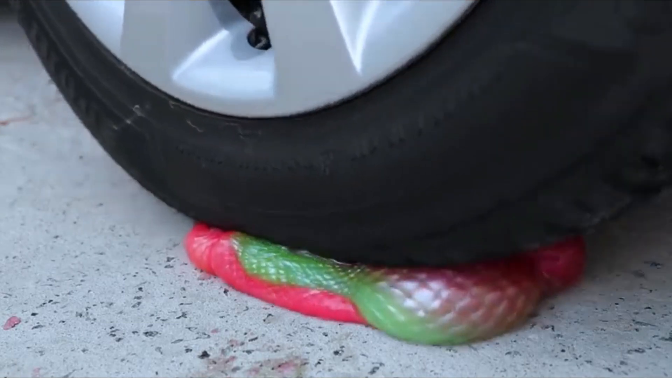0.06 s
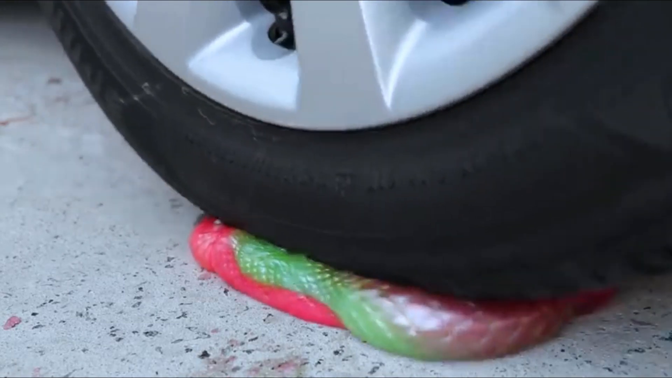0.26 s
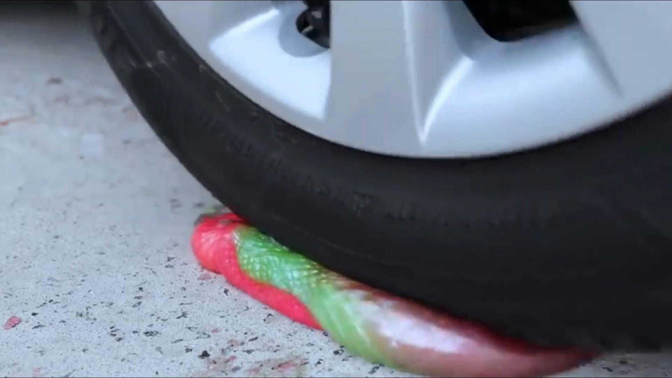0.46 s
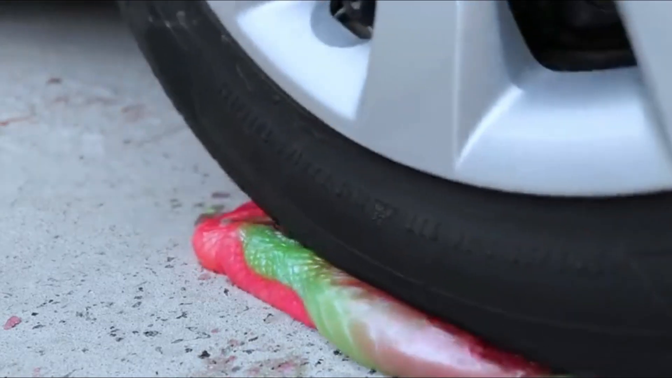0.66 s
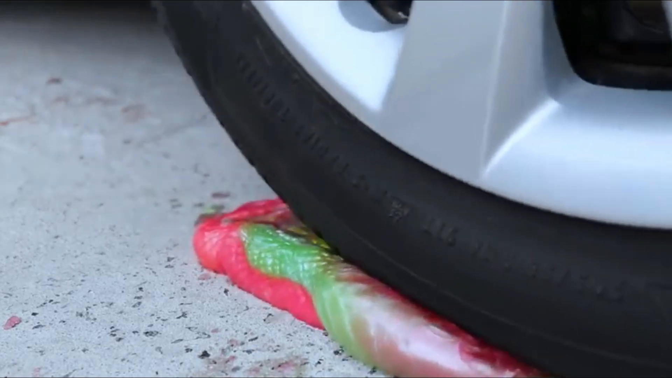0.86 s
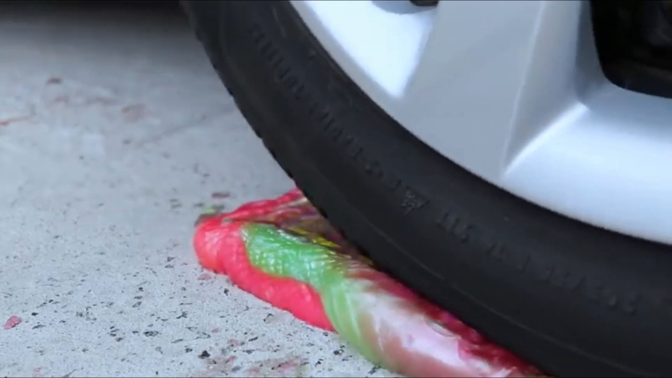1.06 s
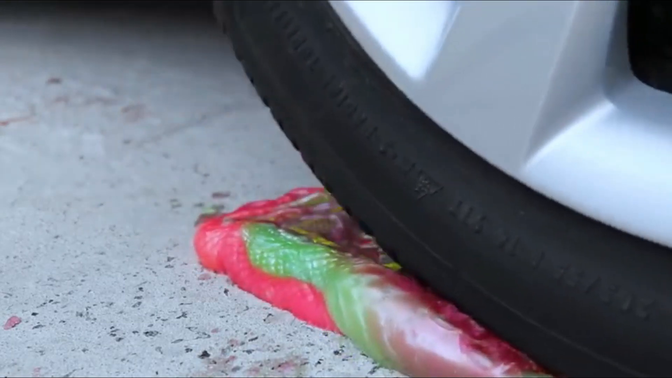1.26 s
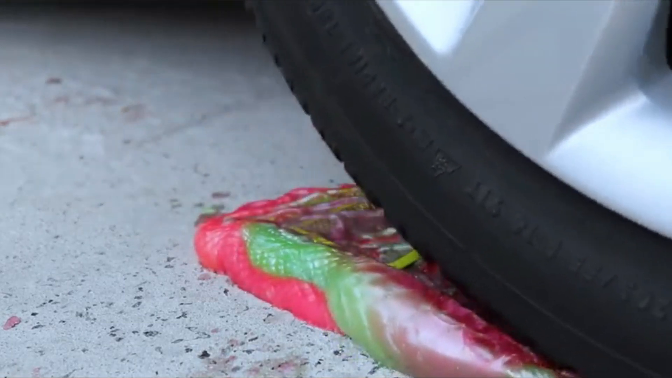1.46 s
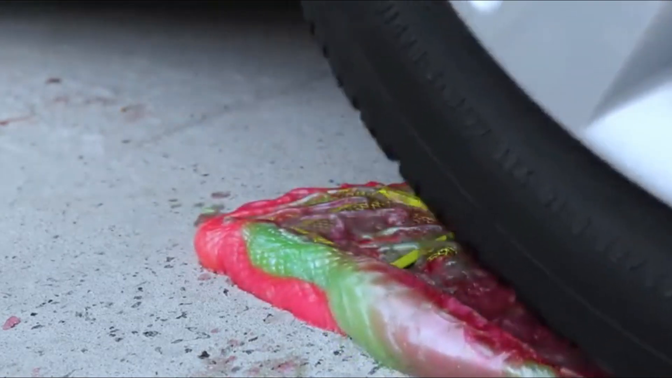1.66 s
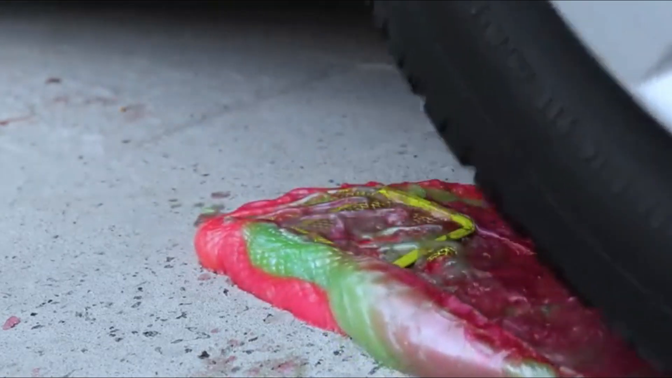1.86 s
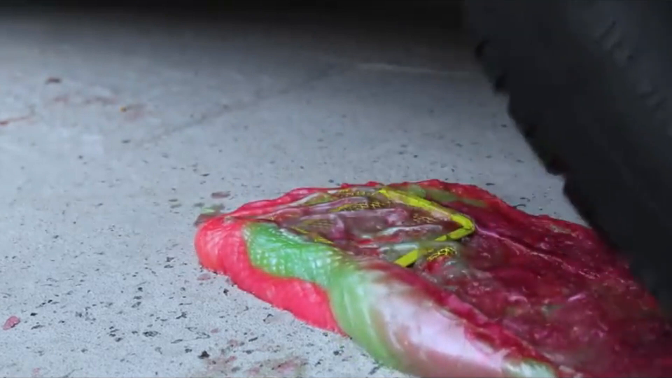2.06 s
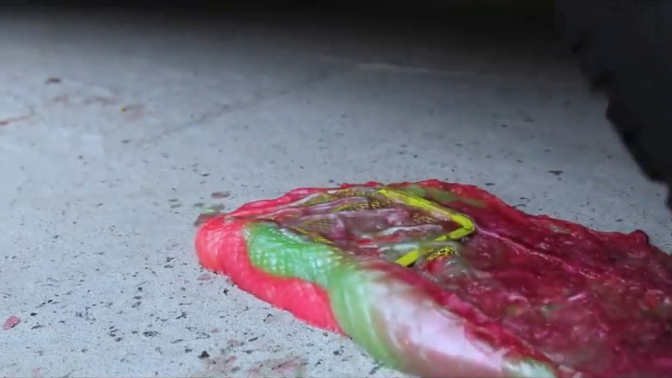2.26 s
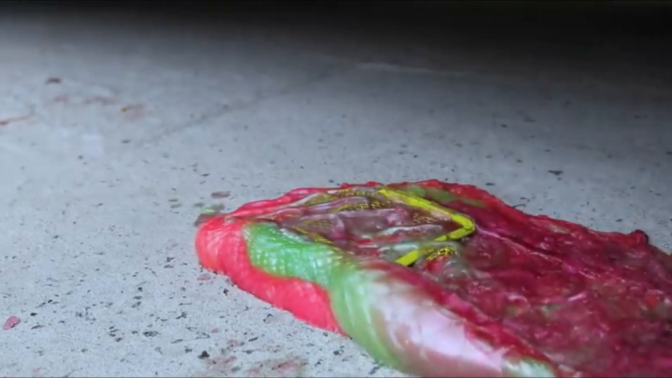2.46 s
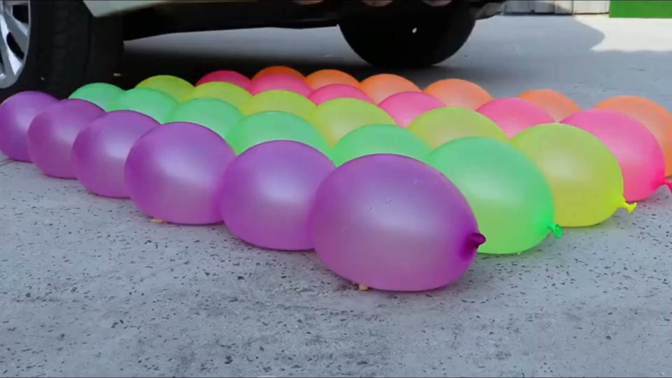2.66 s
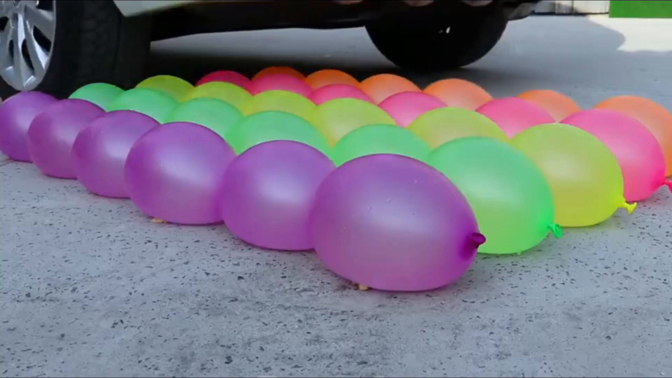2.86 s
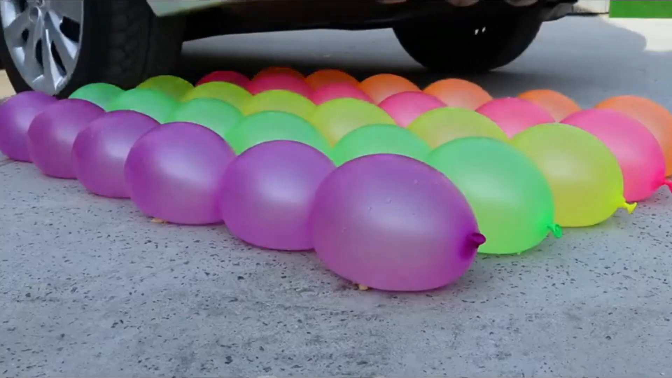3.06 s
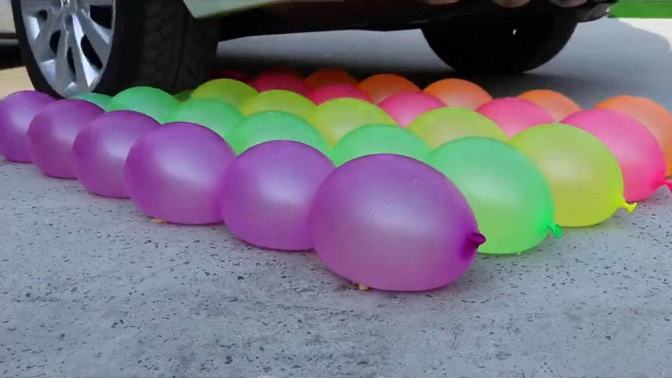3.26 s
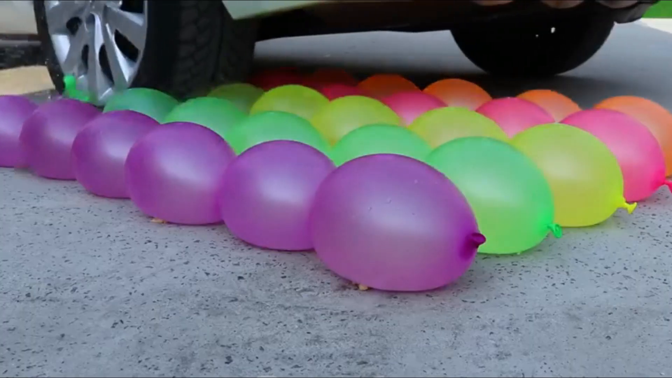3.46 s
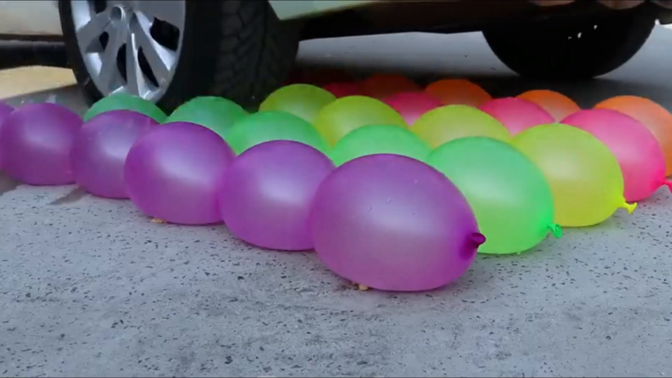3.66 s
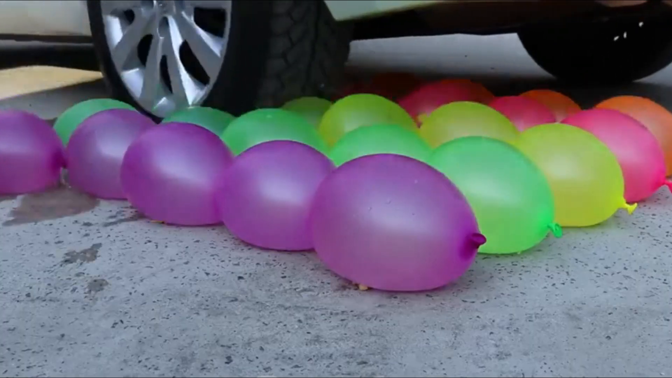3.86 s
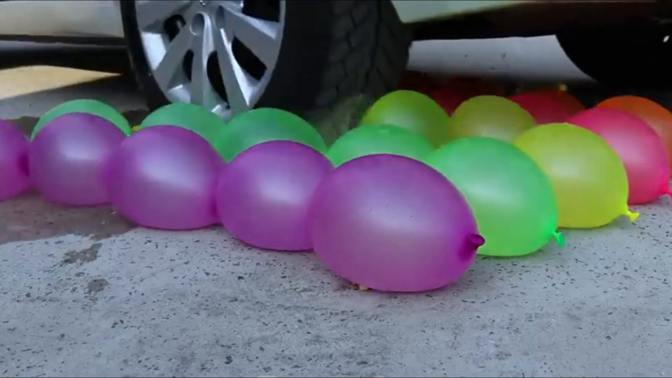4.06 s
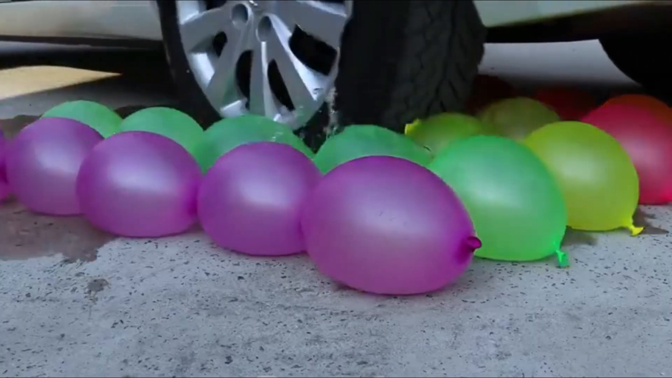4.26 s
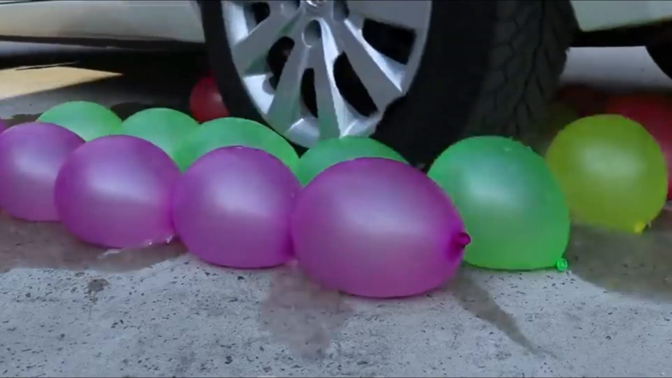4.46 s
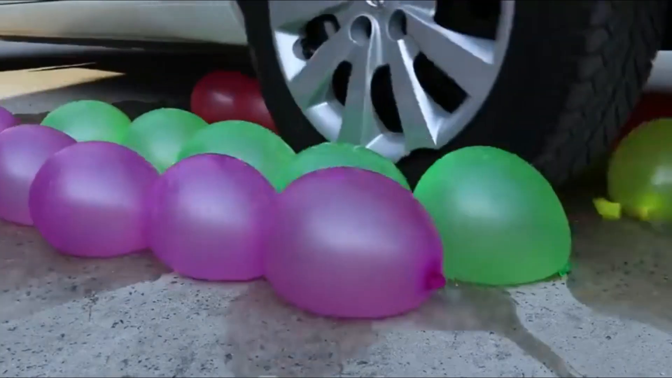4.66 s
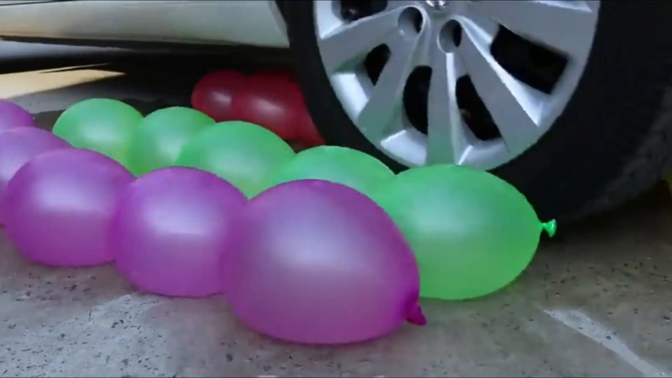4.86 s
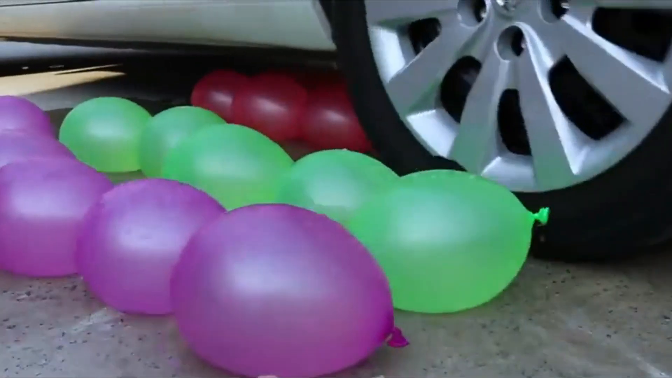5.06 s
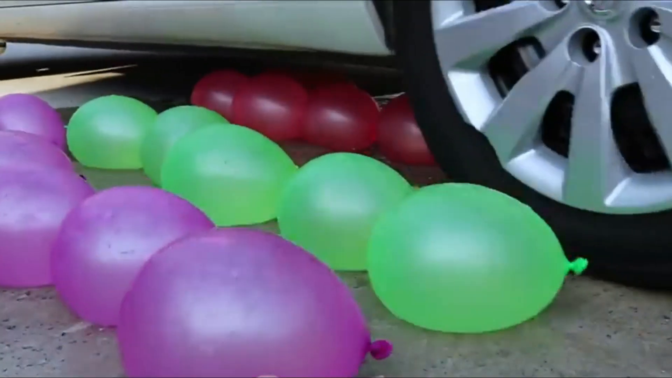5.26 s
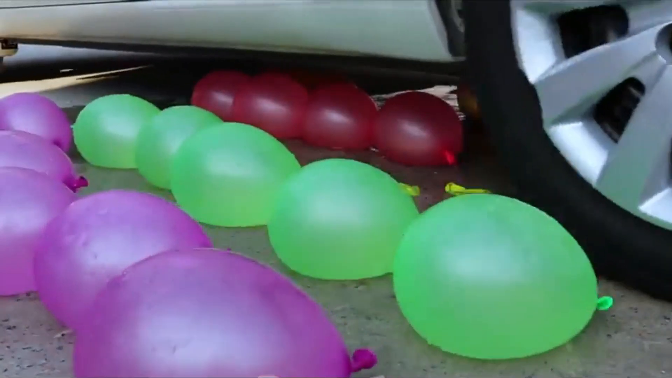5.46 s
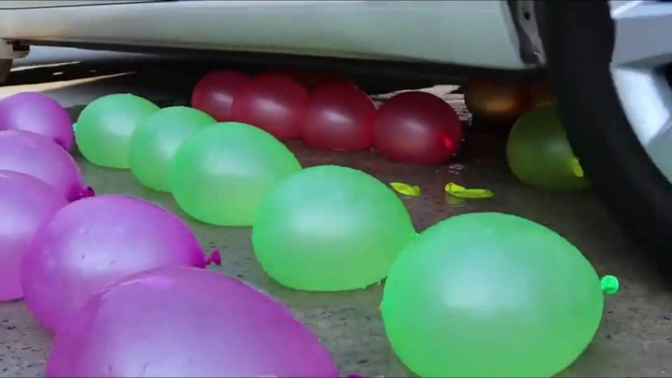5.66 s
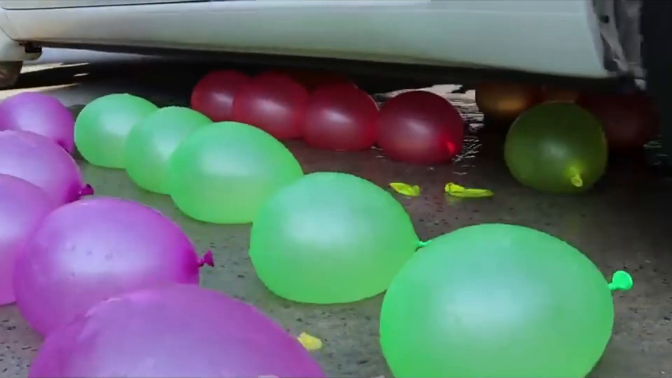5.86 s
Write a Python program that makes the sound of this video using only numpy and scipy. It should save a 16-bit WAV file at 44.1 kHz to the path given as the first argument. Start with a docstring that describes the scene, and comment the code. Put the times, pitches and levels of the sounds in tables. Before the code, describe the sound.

Close up on a quiet outdoor pavement, a car tyre flattens a slime-filled ball: soft squelches, irregular wet ticks, fine crackle and tiny rubbery squeaks, with a very high, faint brake squeal. After a short lull, four water balloons crack open about a second apart in total, far louder than before, with spray, slaps and gurgling, thinning to drips over faint traffic. Dry, close mono microphone.

```python
"""A quiet street: a car tyre squashes a slime-filled mesh ball on concrete, then rolls into water balloons.
The slime gives wet ticks, crackle and squeaks, made from short noises, ringing clicks and gliding tones.
A thin brake squeal is one high tone. Four balloons burst as cracks of noise with a ringing cavity and spray.
Water gushes, slaps and gurgles as ringing clicks and rising tones, the air in the tyre hums as a low tone,
and drops patter out over the street's traffic hiss and rumble."""
import sys
import numpy as np
from scipy import signal
from scipy.fft import rfft, irfft
from scipy.io import wavfile
from scipy.ndimage import uniform_filter1d

SR = 44100
rng = np.random.default_rng(int(sys.argv[2]) if len(sys.argv) > 2 else 0)


def to_wav(sig):
    """Store sig (one row per channel, or 1-D mono) as 16-bit WAV at the path in sys.argv[1].

    Samples outside -1..1 are clipped; the rate is SR.
    """
    pcm = np.clip(np.atleast_2d(sig), -1, 1) * 32767
    pcm = np.round(pcm).astype(np.int16)
    wavfile.write(sys.argv[1], SR, pcm.T)  # frames by channels


N = 261072   # length of the sound in samples

# Gushes of loose water, each running until the next: start_s [s], gurgle_db [dB], gurgle_centre_hz [Hz],
# gurgle_drain [dB per s], spatter_db [dB], spatter_drain [dB per s]
GUSH_TABLE = [(3.51, -45, 888, 16, -35, 67), (3.94, -46, 1050, 60, -46.5, 58),
              (4.0, -34, 1180, 49, -49.5, 15), (4.236, -39, 820, 10, -39.5, 34),
              (4.603, -33.5, 885, 257, -42, 197), (4.705, -46, 940, 78, -52.5, 66)]


def amp(db):
    """Turn decibels into a gain."""
    return 10 ** (np.asarray(db) / 20)


def rms_one(x):
    """Scale a signal to an average strength (rms) of 1."""
    return x / np.sqrt(np.mean(x ** 2) + 1e-20)


def in_time(rows):
    """Draw each column of a curve table at every sample; outside its span it is silent (-120 dB)."""
    start_s, *columns = np.transpose(rows)
    t = np.arange(N) / SR
    return [np.interp(t, start_s, column, left=-120, right=-120) for column in columns]


def drift(rate_hz):
    """Smooth random wandering with rms 1; a higher rate wanders faster."""
    step = 40   # samples between the wandering points
    r = np.exp(-2 * np.pi * step * rate_hz / SR)
    noise = rng.standard_normal(N // step + 2002)
    slow = signal.lfilter([1], [1, -2 * r, r * r], noise)[2000:]   # drop the filter's start-up
    return np.interp(np.arange(N) / step, np.arange(len(slow)), rms_one(slow))


def resonate(x, hz, width_hz):
    """Let a signal ring at one pitch: a two-pole resonance with gain 1 at its top."""
    r = np.exp(-np.pi * width_hz / SR)
    top = (1 - r * r) / 2
    return signal.lfilter([top, 0, -top], [1, -2 * r * np.cos(2 * np.pi * hz / SR), r * r], x)


def coloured(size, spectrum, tilt_db=0.):
    """Noise of rms 1 shaped by a spectrum table, tilted by so many dB per octave about 2 kHz."""
    hz = np.maximum(np.fft.rfftfreq(size, 1 / SR), 1)
    table_hz, table_db = np.array(spectrum).T
    db = np.interp(np.log(hz), np.log(table_hz), table_db) + tilt_db * np.log2(hz / 2000)
    return rms_one(irfft(rfft(rng.standard_normal(size)) * amp(db), size))


def add(out, start_s, sound):
    """Mix a sound in at its start time."""
    i = round(start_s * SR)
    out[i:i + len(sound)] += sound[:N - i]


def span(low_hz, high_hz, tilt_db, count):
    """Pitches spread evenly in octaves and their strengths, tilted in dB from lowest to highest."""
    return np.geomspace(low_hz, high_hz, count), amp(np.linspace(0, tilt_db, count))


def grains(per_s, pitches_hz, weights, cycles, spread_db):
    """Random clicks of uneven size, each ringing a few cycles at one of the pitches; rms about 1."""
    sizes = amp(spread_db * np.minimum(rng.exponential(1, N), 4)) * rng.choice([-1, 1], N)
    clicks = sizes * (rng.random(N) < per_s / SR) + 1e-18
    dealt = rng.integers(0, len(pitches_hz), N)   # which pitch each click gets
    total = 0
    for k, (hz, weight) in enumerate(zip(pitches_hz, weights)):
        ring = resonate(clicks * (dealt == k), hz, 2.95 * hz / cycles)
        total = total + weight * rms_one(resonate(ring, hz, hz))
    return total / np.sqrt(sum(weight ** 2 for weight in weights))


def wet_hits(rows, width_share):
    """Each contact is a snap with a bright edge, then a short puff through the same pocket of air."""
    snap_t60_s = 0.0012   # time to fade by 60 dB
    out, t = np.zeros(N), np.arange(4096) / SR
    for start_s, peak_db, hz, puff_t60_s, puff_db, edge_db in rows:
        puff, snap = rng.standard_normal((2, len(t)))
        puff = resonate(puff * amp(-60 * t / puff_t60_s), hz, width_share * hz)
        puff = resonate(puff, hz, 1.55 * hz)
        snap = snap * amp(-60 * t / snap_t60_s)
        edge = resonate(snap, 8800, 9000)
        body = resonate(resonate(snap, hz, 0.89 * hz), hz, 1.7 * hz)
        # puff and edge levels are relative to the snap's peak
        for part, part_db in ((body, 0), (puff, puff_db), (edge, edge_db)):
            add(out, start_s, amp(peak_db + part_db) * part / np.abs(part).max())
    return out


def chance_hits(start_s, end_s, bed_db, above_db, spread_db, low_hz, high_hz, count):
    """Rows (start_s, peak_db, pitch_hz) of small random contacts, as strong as the bed they rise from."""
    when, weakness, pitch = rng.random((count, 3)).T
    hit_s = start_s + (end_s - start_s) * when
    peak_db = bed_db[(hit_s * SR).astype(int)] + above_db - spread_db * weakness
    return np.transpose([hit_s, peak_db, low_hz * (high_hz / low_hz) ** pitch])


def glides(rows, overtone_db, onset):
    """Short gliding tones, uneven in strength and pitch, with up to two overtones; a small onset is abrupt."""
    out = np.zeros(N)
    for start_s, length_s, start_hz, end_hz, level_db, rough in rows:
        u = np.linspace(0, 1, int(length_s * SR))   # progress through the tone
        wobble = rms_one(uniform_filter1d(rng.standard_normal((2, 4096)), size=60))[:, :len(u)]
        hz = start_hz * (end_hz / start_hz) ** u * (1 + .05 * rough * wobble[0])
        phase = 2 * np.pi * np.cumsum(hz) / SR
        tone = sum(amp(overtone_db * k) * np.sin((k + 1) * phase)
                   for k in range(3) if (k + 1) * end_hz < .4 * SR)   # leave out overtones that are too high
        swell = np.sin(np.pi * u ** onset)
        add(out, start_s, amp(level_db) * tone * swell * (1 + rough * wobble[1]))
    return out


def bursts():
    """The skin rips in a dense crack, the squeezed cavity rings noisily, spray and a dull thump follow."""
    # Balloon bursts: start_s [s], level_db [dB] of the whole burst; relative to it tear_db [dB]; cavity_hz [Hz],
    # cavity_db [dB], cavity_t60_s [s], spray_db [dB]; tilt_db [dB per octave] of crack and spray
    burst_table = [(3.4972, -12.5, 9.5, 2660, 6.5, 0.021, -16, -3),
                   (3.9853, -12.5, -11.5, 1340, 10.5, 0.047, -5, -2.5),
                   (4.2196, -13, 6, 1630, -1.5, 0.053, -20, -2.07),
                   (4.5900, -17.5, 2.5, 863, 1.5, 0.031, -8.5, 0.7)]
    # Colour of the crack: pitch_hz [Hz], level_db [dB per Hz]
    crack_spectrum = [(60, -47.5), (150, -12), (700, 5.5), (1800, -9.5), (4200, -3), (6300, -11),
                      (8500, -4.5), (13500, -10.5), (16000, -17.5)]
    # Colour of the spray: pitch_hz [Hz], level_db [dB per Hz]
    spray_spectrum = [(100, -29), (400, -8), (1200, 7.5), (3000, -11), (6000, -10.5), (9000, -15),
                      (16000, -23)]
    crack_t60_s, tear_t60_s, spray_t60_s = 0.049, 0.007, 0.18   # times to fade by 60 dB
    low_pass = signal.butter(2, 1100, fs=SR, output="sos")
    high_pass = signal.butter(2, 250, "high", fs=SR, output="sos")
    out, size = np.zeros(N), 2 ** 14
    t = np.arange(size) / SR
    for start_s, level_db, tear_db, hz, cavity_db, cavity_t60_s, spray_db, tilt_db in burst_table:
        noise = coloured(size, crack_spectrum, tilt_db)
        # the tear is heard first, the mass of water moves later: the low part comes in over a few ms
        noise = noise - signal.sosfiltfilt(low_pass, noise) * np.exp(-(t / .003) ** 2)
        fade = amp(-60 * t / crack_t60_s) + amp(tear_db - 60 * t / tear_t60_s)
        crack = noise * fade * np.minimum(t / 0.000099, 1)

        lumps = amp(1.6 * rms_one(uniform_filter1d(rng.standard_normal(size), size=150)))   # spray lands in lumps
        spray = coloured(size, spray_spectrum, tilt_db) * lumps
        spray = spray * amp(spray_db - 60 * t / spray_t60_s) * np.minimum(t / 0.005, 1)

        cavity = rms_one(resonate(resonate(rng.standard_normal(size), hz, 0.14 * hz), hz, hz))
        cavity = cavity * amp(cavity_db - 60 * t / cavity_t60_s) * np.minimum(t / 0.0045, 1)

        thump = rms_one(resonate(rng.standard_normal(size), 90, 110))
        thump = thump * amp(-33.5 - 60 * t / .5) * np.minimum(t / 0.021, 1)

        sharp = signal.sosfilt(high_pass, crack + cavity)   # a small tear radiates no bass
        add(out, start_s, amp(level_db) * (sharp + spray + thump))
    return out


def water():
    """Gurgling bubbles in the gush, spatter and fine patter, slaps, drops, and the hum of the tyre's air ring."""
    # Water slapping concrete and rubber: start_s [s], peak_db [dB], pitch_hz [Hz]
    slap_table = [(3.523, -33, 670), (3.54, -36.5, 252), (3.611, -32, 716), (3.632, -36, 283),
                  (3.701, -37, 638), (3.816, -49, 920), (3.944, -39, 1500), (3.955, -34, 900),
                  (4.137, -37, 304), (4.169, -37, 1040), (4.291, -25.5, 805), (4.301, -31.5, 570),
                  (4.365, -28.5, 1010), (4.439, -30.5, 1110), (4.505, -36, 745), (4.691, -36.5, 1540),
                  (4.711, -33, 1770), (4.88, -36, 1300), (4.912, -39.5, 2020), (5.481, -50, 2360),
                  (5.669, -50.5, 1736)]
    # Single drops at set times: start_s [s], peak_db [dB], pitch_hz [Hz]
    drop_table = [(3.5245, -19, 4300), (3.621, -32, 3640), (3.6686, -50, 4130), (3.732, -38, 5630),
                  (3.7713, -38, 3480), (3.9063, -43, 5310), (3.9609, -41, 4300), (4.0242, -24.5, 4030),
                  (4.1155, -31.5, 4100), (4.144, -36, 4780), (4.1894, -30.5, 4280), (4.298, -28.5, 8280),
                  (4.3266, -33, 4580), (4.3394, -46, 4900), (4.3884, -29, 3650), (4.514, -52, 4500),
                  (4.6663, -31, 4900), (4.9478, -45, 4920), (5.141, -45, 9050), (5.1608, -44.5, 8370),
                  (5.2002, -39.5, 9480), (5.3203, -44, 3520), (5.8466, -43, 8890)]
    # Closing air pockets: start_s [s], length_s [s], start_hz [Hz], end_hz [Hz], peak_db [dB], roughness [0-1]
    bubble_table = [(4.262, 0.026, 293, 520, -36.5, .2), (4.445, 0.037, 430, 610, -41, 0.26),
                    (4.502, 0.023, 656, 756, -30.5, 0.01), (4.552, 0.036, 790, 1044, -35.5, 0.1),
                    (4.708, .065, 381, 956, -41.5, 0.22), (4.77, 0.05, 514, 690, -49, 0.08),
                    (4.96, 0.013, 1010, 1220, -50, 0.2)]
    # Hum of the air inside the tyre: start_s [s], peak_db [dB]
    hum_curve = [(3.49, -78), (3.51, -36.5), (3.58, -50), (3.68, -59), (3.79, -52), (3.96, -57),
                 (4.05, -67.5), (4.7, -64.5), (5.3, -82)]
    gurgle_db, centre_hz, spatter_db, patter_db = gushes()

    pitches = np.geomspace(330, 2200, 14)
    centre = np.maximum(centre_hz, 300)
    near = [np.exp(-.5 * (np.log2(hz / centre) / 0.7) ** 2) + 0.019 for hz in pitches]   # most share a size
    gurgle = grains(2500 * amp(3.6 * drift(27)), pitches, near, cycles=10.0, spread_db=2.0)
    spatter = grains(1200 * amp(4 * drift(27)), *span(1640, 4880, -6.0, count=10), cycles=24.0, spread_db=1.0)
    patter = grains(6000 * amp(4.1 * drift(40)), *span(3900, 14140, 3, count=10), cycles=4.7, spread_db=3.5)
    surge_db = 1.75 * drift(6)   # the gush comes in gulps
    flow = amp(gurgle_db + surge_db) * gurgle + amp(spatter_db + surge_db) * spatter + amp(patter_db) * patter

    hum_hz = 231
    hum = amp(in_time(hum_curve)[0]) * np.sin(2 * np.pi * hum_hz * np.arange(N) / SR)

    # to each row add the puff's fade time [s], puff level [dB] and edge level [dB]
    slaps = [(*slap, 0.065, 3, -21) for slap in slap_table]
    small = chance_hits(GUSH_TABLE[0][0], N / SR, spatter_db, above_db=10.5, spread_db=12.5,
                        low_hz=1500, high_hz=8000, count=130)
    drops = [(*drop, 0.025, -4.5, -11) for drop in [*drop_table, *small]]
    hits = wet_hits(slaps, width_share=0.16) + wet_hits(drops, width_share=0.35)

    bubbles = glides(bubble_table, overtone_db=-26, onset=0.96) + blips(gurgle_db, centre_hz, count=240)
    return flow + hum + hits + bubbles


def gushes():
    """Levels and bubble pitch of the water: each gush starts at full strength and drains to a trickle."""
    trickle_db, trickle_spatter_db, trickle_patter_db = -69.5, -59.5, -60   # thin run-off under the gushes
    trickle_dries = 7   # dB per s, for spatter and patter after the last gush starts
    patter_share_db, patter_drains_faster = -7.5, 1.3   # patter is the fine share of the spatter
    start_s, gurgle_db, hz, gurgle_drain, spatter_db, spatter_drain = np.transpose(GUSH_TABLE)
    t = np.arange(N) / SR
    k = np.maximum(np.searchsorted(start_s, t) - 1, 0)   # which gush is running
    age, wet = np.abs(t - start_s[k]), t > start_s[0]
    dried_db = -trickle_dries * np.maximum(t - start_s[-1], 0)

    gurgle = np.hypot(amp(gurgle_db[k] - gurgle_drain[k] * age), amp(trickle_db))
    spatter = np.hypot(amp(spatter_db[k] - spatter_drain[k] * age), amp(trickle_spatter_db + dried_db))
    fine_db = spatter_db[k] + patter_share_db - patter_drains_faster * spatter_drain[k] * age
    patter = np.hypot(amp(fine_db), amp(trickle_patter_db + dried_db))
    levels_db = 20 * np.log10(np.array([gurgle, spatter, patter]) * wet + 1e-6)
    return levels_db[0], hz[k], levels_db[1], levels_db[2]


def blips(gurgle_db, centre_hz, count):
    """Chance bubbles in the gush: each rises in pitch as it nears the surface."""
    when, pitch, life, climb, weakness = rng.random((count, 5)).T
    start_s = 3.52 + 1.5 * when
    at = (start_s * SR).astype(int)
    start_hz = centre_hz[at] * 2 ** (1.8 * pitch ** 1.1 - .8)
    end_hz = start_hz * (1.035 + 0.28 * climb)
    length_s = (6 + 16 * life) / start_hz   # 6 to 22 cycles of the starting pitch
    level_db = gurgle_db[at] - 6 - 10 * weakness - 5 * pitch
    rows = np.transpose([start_s, length_s, start_hz, end_hz, level_db, 0.11 * life])
    return glides(rows, overtone_db=-35.5, onset=0.45)


def slime():
    """Squelch, crackle and fine fizz under the rolling tread, with ticks, squeaks and a thud from the ball."""
    # Slime under the tread: start_s [s], squelch_db [dB], crackle_db [dB]
    slime_curve = [(0, -61.5, -109), (.283, -67.5, -78), (0.287, -42.5, -62), (0.321, -66, -45),
                   (.35, -61.5, -60), (.46, -67.5, -64.5), (.58, -54.5, -54), (.78, -55.5, -51),
                   (.84, -50, -56), (.93, -55.5, -71), (.97, -62.5, -56), (1.15, -62, -66.5),
                   (1.35, -63.5, -59.5), (1.6, -73, -62.5), (1.88, -63, -60.5), (2.0, -69, -67.5),
                   (2.74, -69, -74)]
    # Grit under the tread, following on: start_s [s], squelch_db [dB], crackle_db [dB]
    grit_curve = [(2.9, -73, -74), (2.97, -65, -68.5), (3.1, -68.5, -72), (3.28, -77, -70.5),
                  (3.449, -93, -71.5)]
    # Ticks at set times, slime, mesh and grit letting go: start_s [s], snap_peak_db [dB], pitch_hz [Hz],
    # puff_db [dB relative to the snap]
    tick_table = [(0.249, -29.5, 1074, -11.5), (0.286, -35.5, 11900, 0), (0.2875, -31, 2520, -10),
                  (0.2895, -48, 7600, -23), (0.318, -33, 1120, -6), (0.327, -50, 8000, -4),
                  (0.417, -48, 2240, 0), (0.445, -43.5, 1780, -6), (0.541, -31, 1970, -11),
                  (0.591, -29.5, 2730, -1), (0.606, -40, 4320, 5), (0.615, -32.5, 4100, -1.5),
                  (0.7265, -33, 11600, -6), (0.735, -28.5, 2150, -8.5), (0.763, -37, 5700, -6),
                  (0.786, -37, 4020, 3), (0.825, -35, 2430, -7), (0.956, -30.5, 4570, -18),
                  (1.044, -35, 5700, -6.5), (1.048, -48, 8400, -16), (1.225, -48.5, 6720, 7.5),
                  (1.264, -43, 5400, -16), (1.369, -44, 6850, -1), (1.386, -41.5, 1080, -5.5),
                  (1.469, -37, 2100, -13), (1.524, -40.5, 1560, 7.5), (1.531, -33.5, 1510, -3.5),
                  (1.666, -40, 2950, -7.5), (1.713, -32.5, 2580, -12), (1.779, -40, 2576, -11),
                  (1.915, -28, 3500, -10), (1.95, -42, 1100, -5), (2.114, -45.5, 3070, -22),
                  (2.242, -37, 1697, -8.5), (2.366, -44.5, 2020, -12), (2.427, -34.5, 3660, -22),
                  (2.608, -46.5, 1330, -6), (2.89, -55, 4500, -13), (2.965, -43.5, 1820, -10),
                  (2.982, -59, 4500, -8), (3.275, -45.5, 2000, -5.5)]
    # Wet rubber squeaks and one short low thud: start_s [s], length_s [s], start_hz [Hz], end_hz [Hz],
    # peak_db [dB], roughness [0-1]
    squeak_table = [(.292, 0.055, 4170, 4920, -42.5, 0.7), (.308, 0.027, 2330, 2610, -38.5, 0),
                    (.325, 0.045, 4130, 4070, -48, 0.8), (.674, 0.086, 5460, 8200, -54, 0.8),
                    (1.259, 0.032, 5490, 5440, -44, 0.38), (1.260, 0.049, 2740, 2670, -46.5, 0.87),
                    (1.262, .02, 3540, 3500, -45, 0.56), (1.284, 0.035, 1410, 1300, -48, 0.97),
                    (.03, 0.042, 155, 157, -48.5, 0.26)]
    squelch_db, crackle_db = in_time([*slime_curve, *grit_curve])
    fizz_db = crackle_db - 14.5

    small = chance_hits(0, grit_curve[-1][0], crackle_db, above_db=16.5, spread_db=16,
                        low_hz=1500, high_hz=11300, count=160)
    ticks = []
    for start_s, peak_db, hz, puff_db in [*tick_table, *[(*tick, -9) for tick in small]]:
        edge_db = -1.5 + 4 * np.log2(hz / 3000)   # low ticks are dull, high ones bright
        ticks.append((start_s, peak_db, hz, 0.069, puff_db, edge_db))   # 0.069 s puff fade time

    clumps = drift(60)   # crackle and fizz bunch together
    crackle_rate = 2000 * amp(7.3 * clumps + 3.1 * drift(30))   # clicks per s
    fizz_rate = 2500 * amp(4.6 * clumps + 3 * drift(80))
    squelch = grains(1500 * amp(3 * drift(26)), *span(328, 1730, 4.3, count=10), cycles=3.6, spread_db=2.5)
    crackle = grains(crackle_rate, *span(1530, 12000, -5.1, count=7), cycles=1.3, spread_db=2.5)
    fizz = grains(fizz_rate, *span(11500, 15000, -1.1, count=4), cycles=7.0, spread_db=2.5)
    bed = amp(squelch_db) * squelch + amp(crackle_db) * crackle + amp(fizz_db) * fizz
    return bed + wet_hits(ticks, width_share=0.19) + glides(squeak_table, overtone_db=-24, onset=0.35)


def brake():
    """A near-pure squeal that swells and fades."""
    # Brake squeal: start_s [s], level_db [dB rms]
    squeal_curve = [(2.03, -85), (2.126, -61), (2.184, -60.5), (2.238, -47), (2.366, -74), (2.41, -90)]
    squeal_hz = 11599
    level_db = in_time(squeal_curve)[0] + 1.0 * drift(40)
    return np.sqrt(2) * amp(level_db) * np.sin(2 * np.pi * squeal_hz * np.arange(N) / SR)


def street():
    """Distant traffic hiss, lumpy rumble, a thin whine and a hollow band, all made from filtered noise."""
    # Colour of the traffic hiss: pitch_hz [Hz], level_db [dB per Hz]
    street_spectrum = [(15, -58), (25, -28.5), (64, 1), (102, -10.5), (285, 0), (363, -3.5), (695, -6.5),
                       (1100, -6.5), (1790, -7), (3340, -18), (9070, -23.5), (16000, -33.5)]
    # Background levels: start_s [s], street_db [dB], rumble_db [dB], whine_db [dB], hollow_db [dB]
    back_curve = [(0, -66.5, -64, -85, -85), (1.7, -65.5, -76.5, -92, -81), (2.1, -67, -73, -79, -68.5),
                  (2.71, -66.5, -74, -85, -69), (2.74, -70.5, -73, -99, -100),
                  (3.4, -63.5, -79.5, -99, -100), (5.92, -63, -74, -99, -95)]
    whine_hz, hollow_hz = 9970, 1340
    street_db, rumble_db, whine_db, hollow_db = in_time(back_curve)
    hiss = coloured(N, street_spectrum)
    rumble = rms_one(resonate(rng.standard_normal(N), 32, 85))
    whine = rms_one(resonate(rng.standard_normal(N), whine_hz, 59))
    hollow = rms_one(resonate(resonate(rng.standard_normal(N), hollow_hz, 154), hollow_hz, 296))
    return (amp(street_db + 1.0 * drift(3.0)) * hiss + amp(rumble_db + 2 * drift(11)) * rumble
            + amp(whine_db) * whine + amp(hollow_db + 2.4 * drift(22)) * hollow)


def scene():
    """All sources added together, one channel."""
    return (bursts() + water() + slime() + brake() + street())[None]


def record(dry):
    """The microphone capsule's colour, a bass roll-off, then a steep top cut."""
    # Capsule colour: pitch_hz [Hz], width_hz [Hz], gain_db [dB]
    capsule_table = [(8000, 2640, 3.5), (10880, 1780, -7.5)]
    cutoff_hz = 16900
    for hz, width_hz, gain_db in capsule_table:
        dry = dry + (amp(gain_db) - 1) * resonate(dry, hz, width_hz)
    dry = signal.sosfilt(signal.butter(2, 40, "high", fs=SR, output="sos"), dry)
    return signal.sosfilt(signal.cheby2(16, 70, cutoff_hz, fs=SR, output="sos"), dry)


dry = scene()
out = record(dry)
to_wav(out)
```